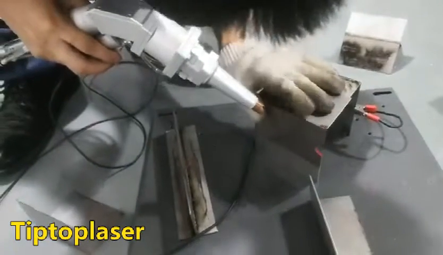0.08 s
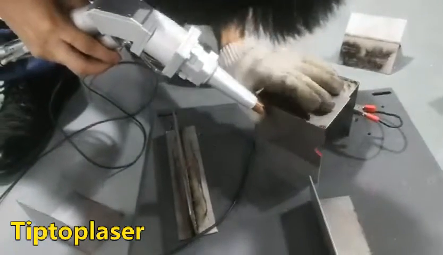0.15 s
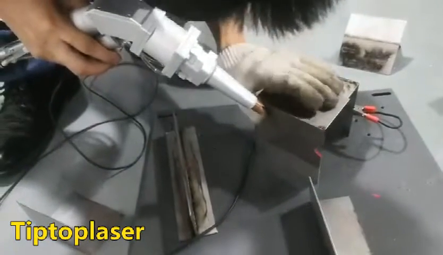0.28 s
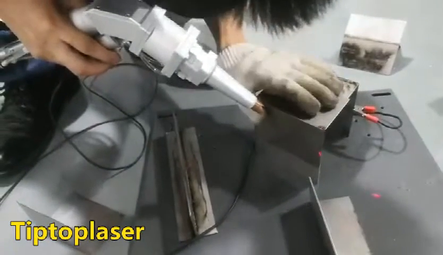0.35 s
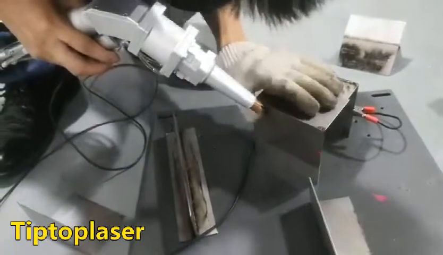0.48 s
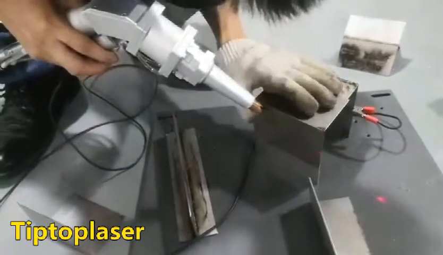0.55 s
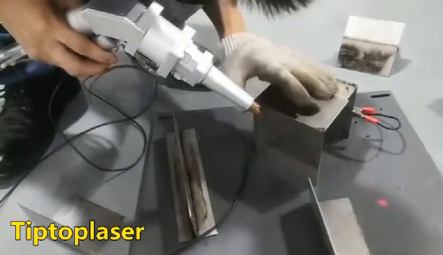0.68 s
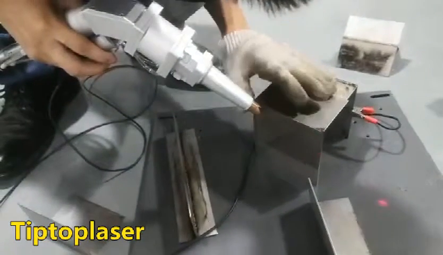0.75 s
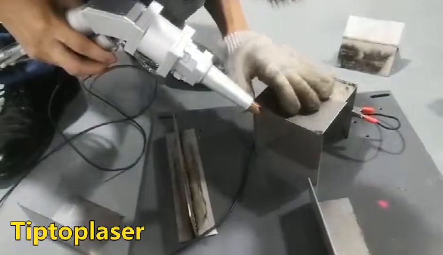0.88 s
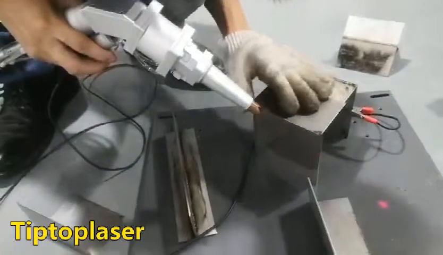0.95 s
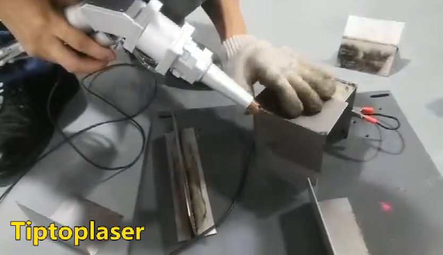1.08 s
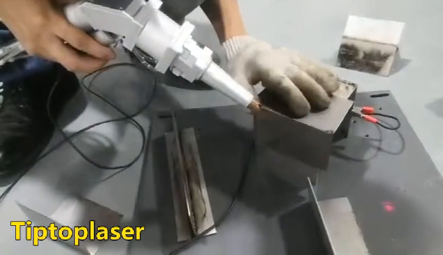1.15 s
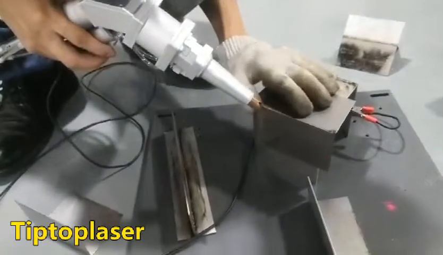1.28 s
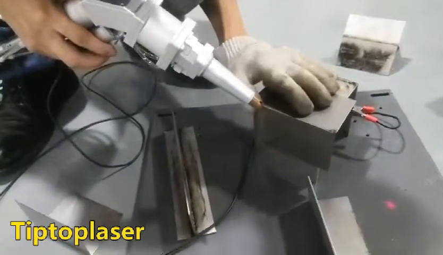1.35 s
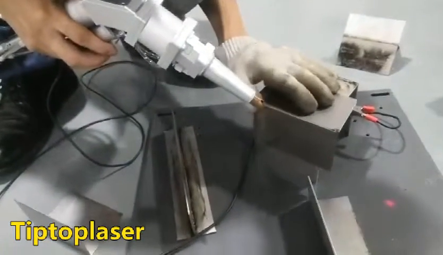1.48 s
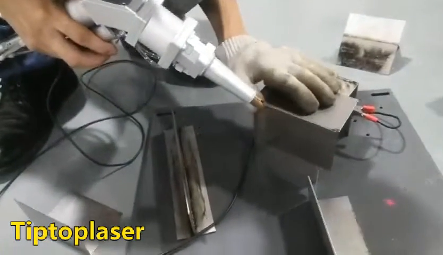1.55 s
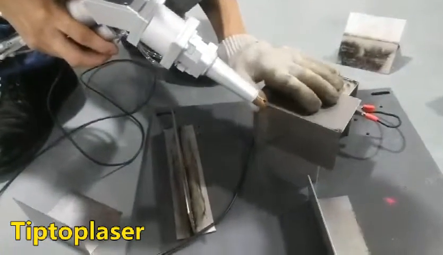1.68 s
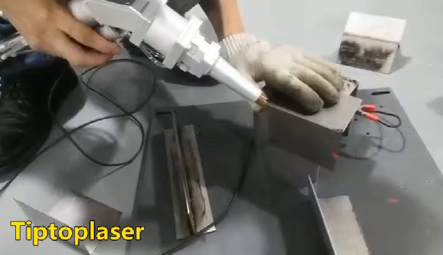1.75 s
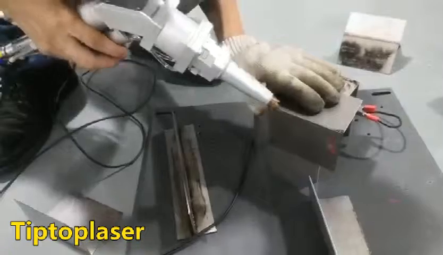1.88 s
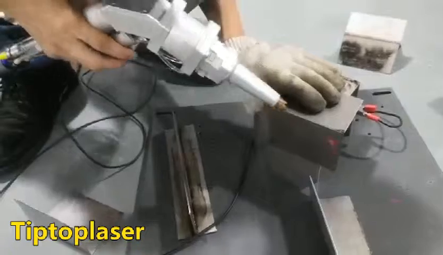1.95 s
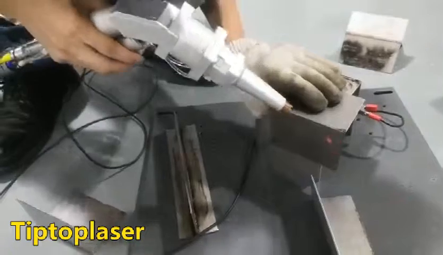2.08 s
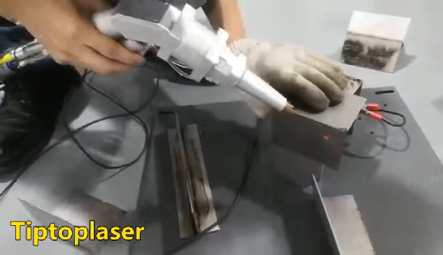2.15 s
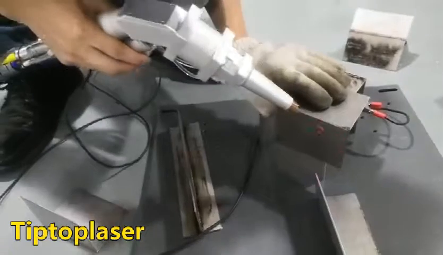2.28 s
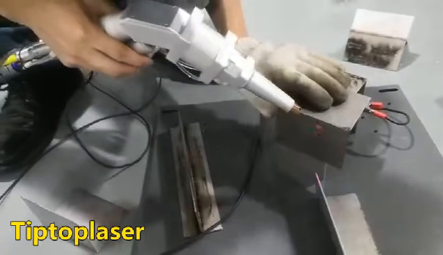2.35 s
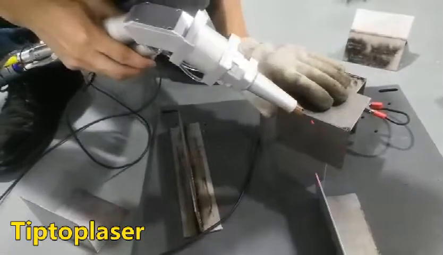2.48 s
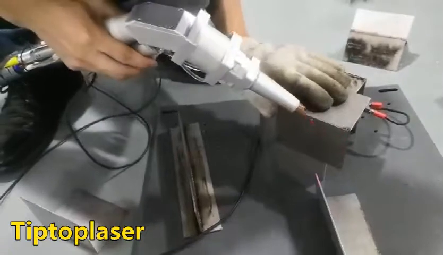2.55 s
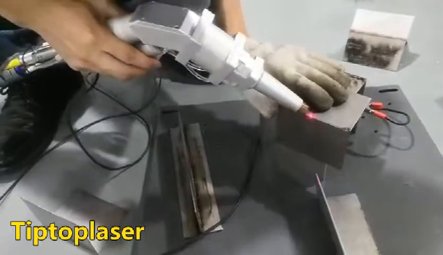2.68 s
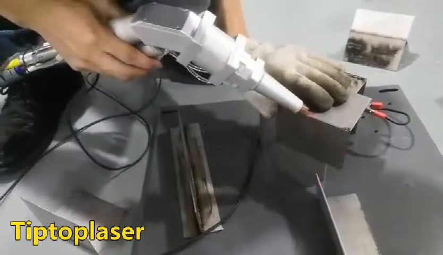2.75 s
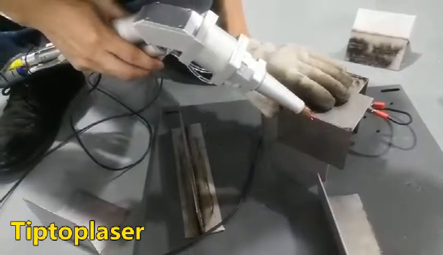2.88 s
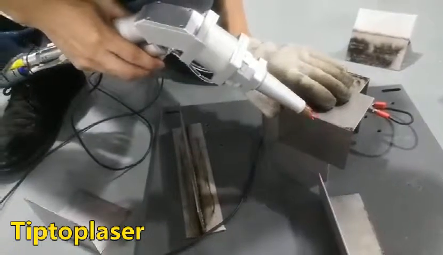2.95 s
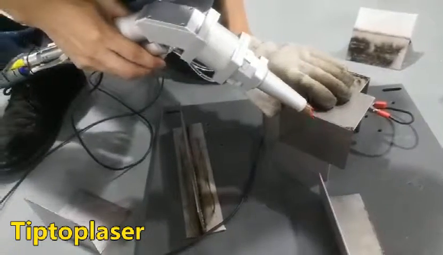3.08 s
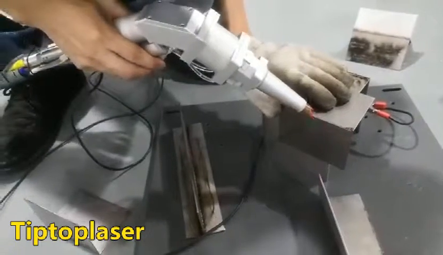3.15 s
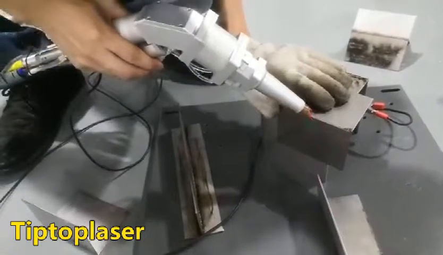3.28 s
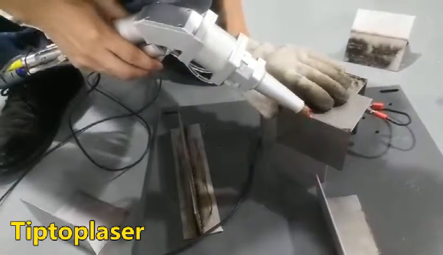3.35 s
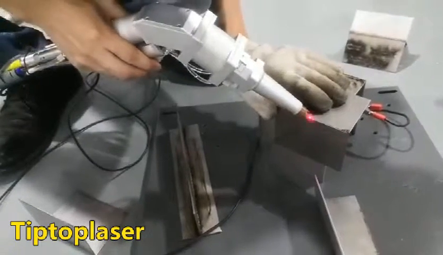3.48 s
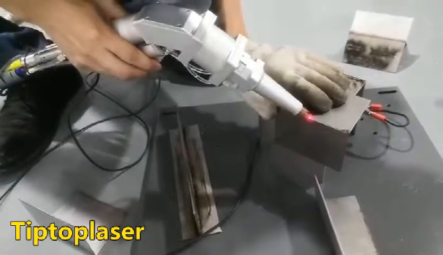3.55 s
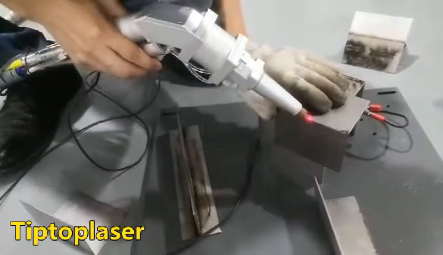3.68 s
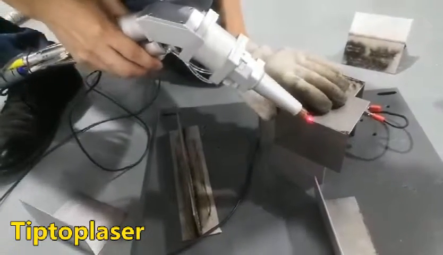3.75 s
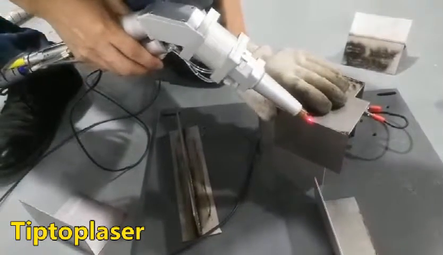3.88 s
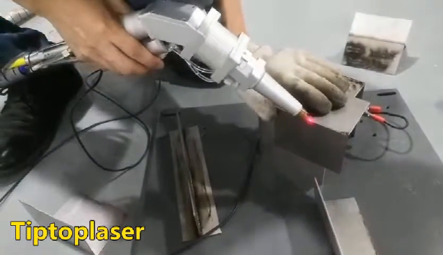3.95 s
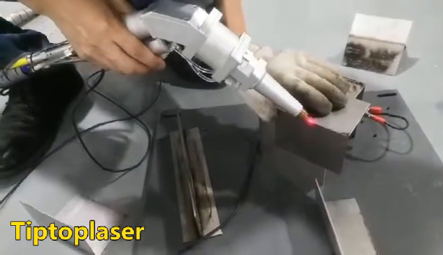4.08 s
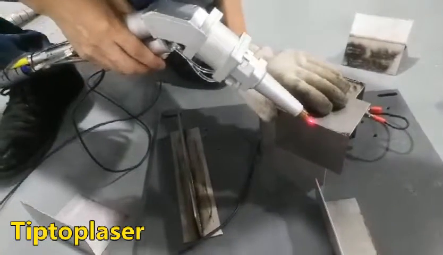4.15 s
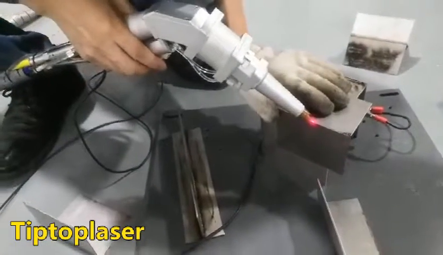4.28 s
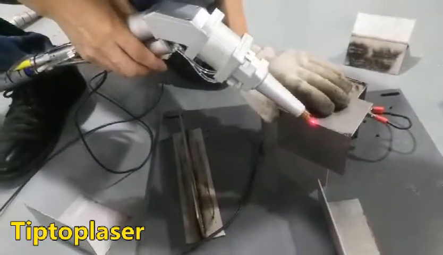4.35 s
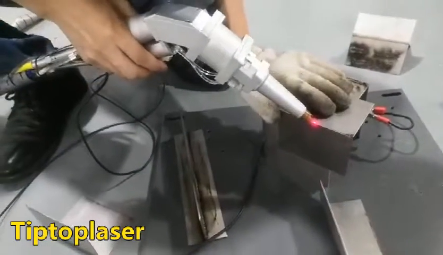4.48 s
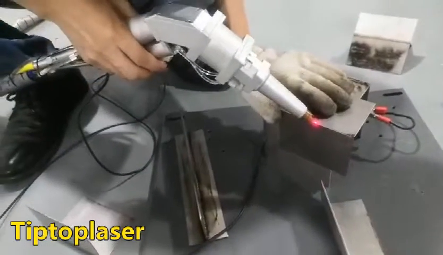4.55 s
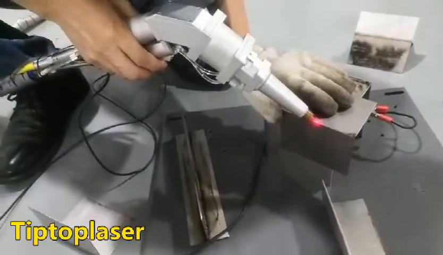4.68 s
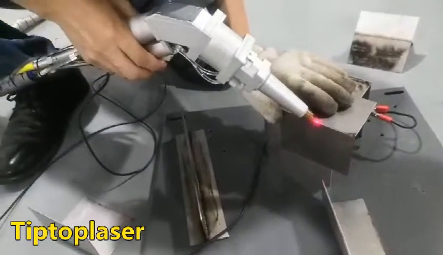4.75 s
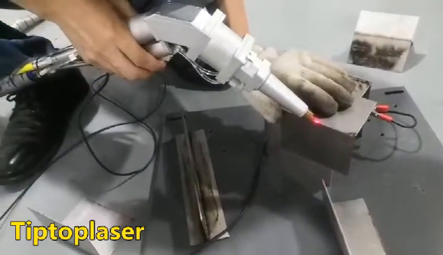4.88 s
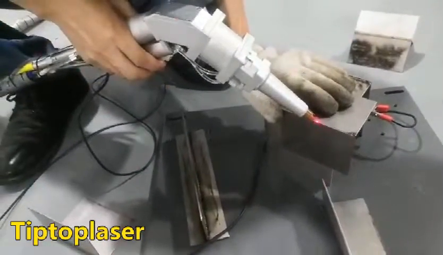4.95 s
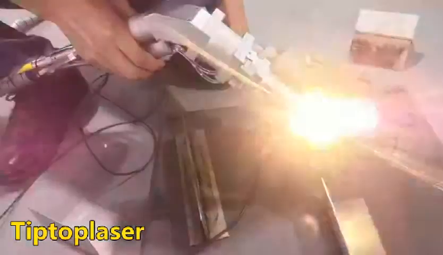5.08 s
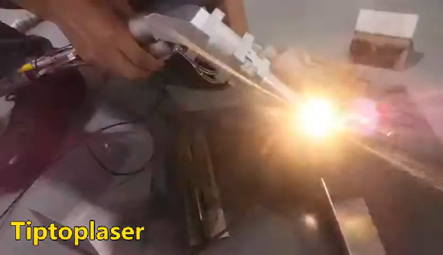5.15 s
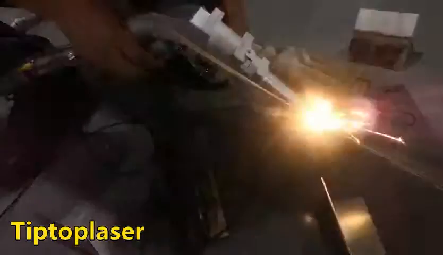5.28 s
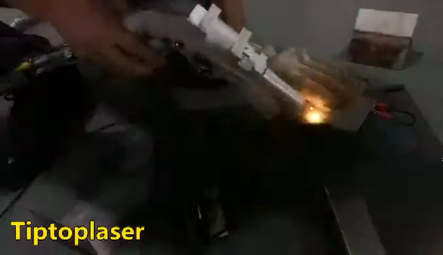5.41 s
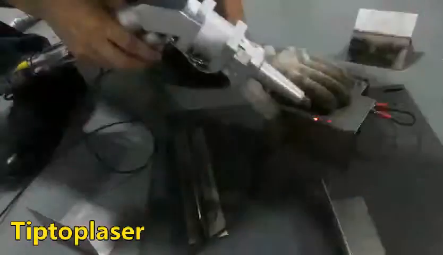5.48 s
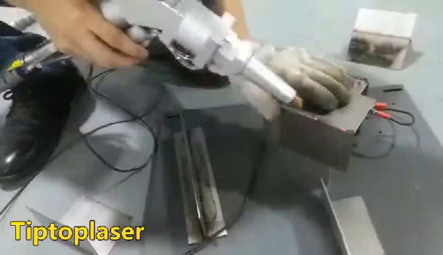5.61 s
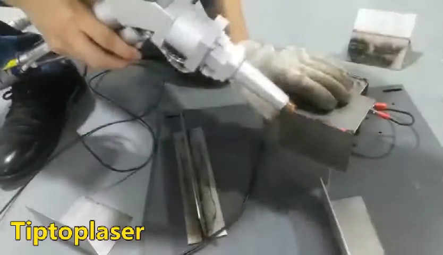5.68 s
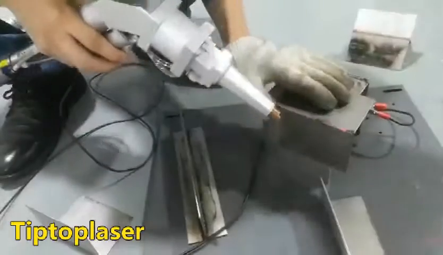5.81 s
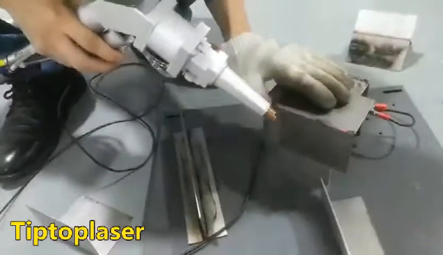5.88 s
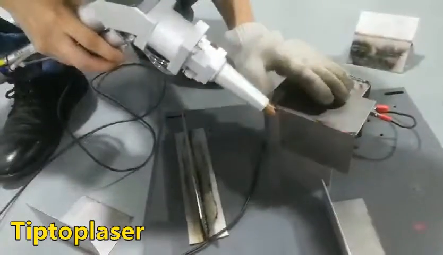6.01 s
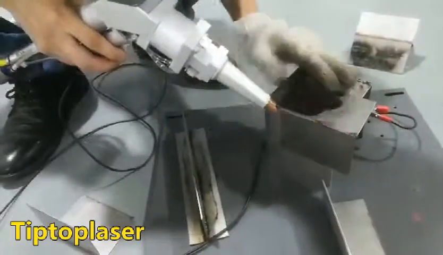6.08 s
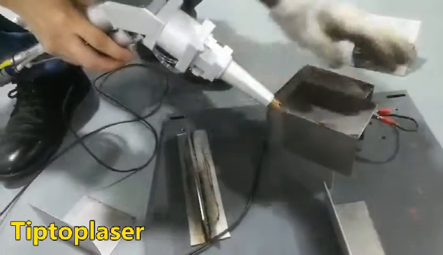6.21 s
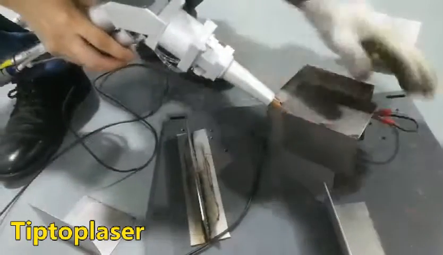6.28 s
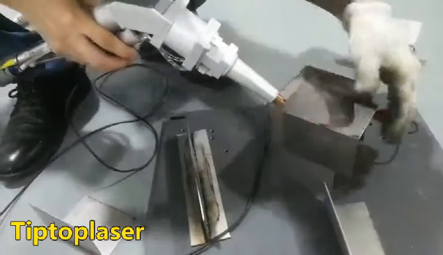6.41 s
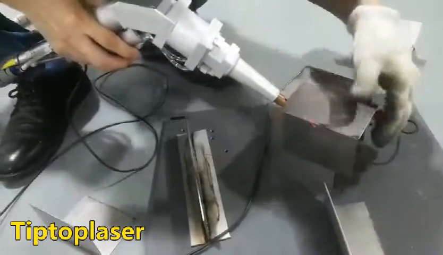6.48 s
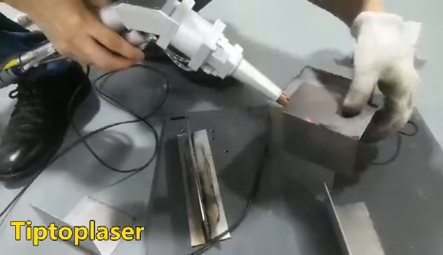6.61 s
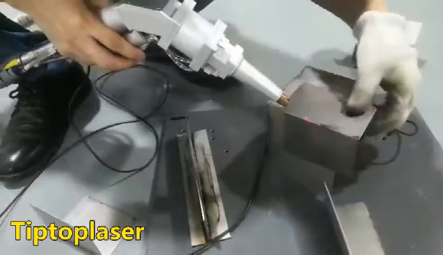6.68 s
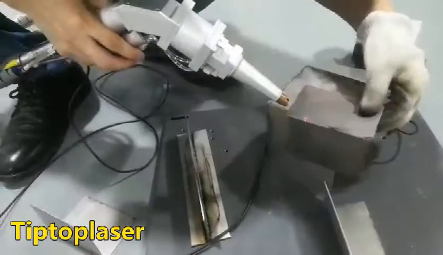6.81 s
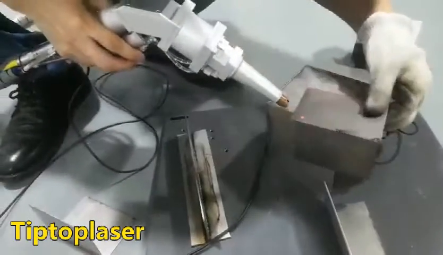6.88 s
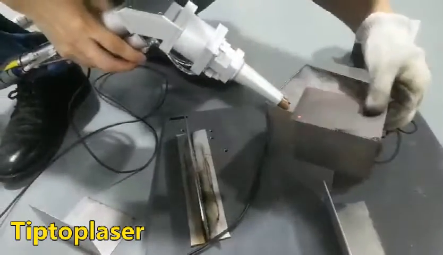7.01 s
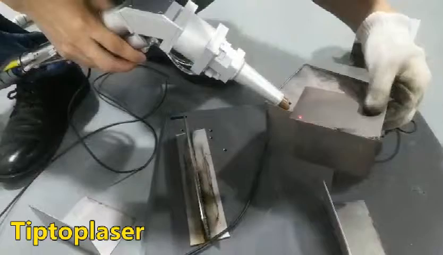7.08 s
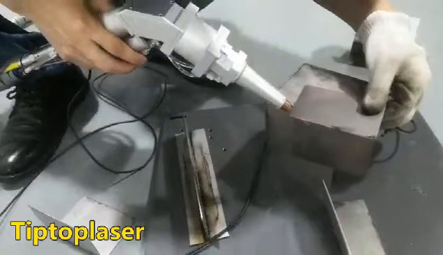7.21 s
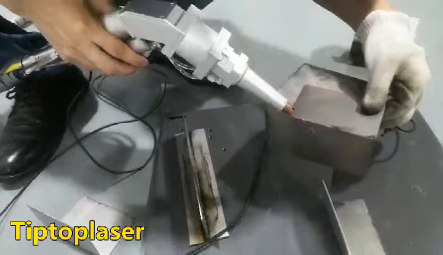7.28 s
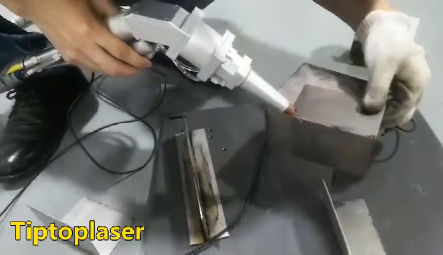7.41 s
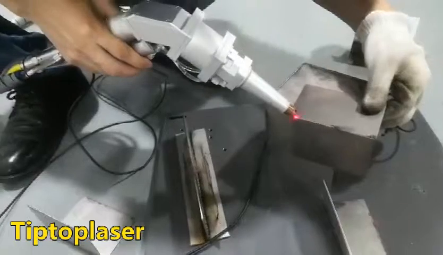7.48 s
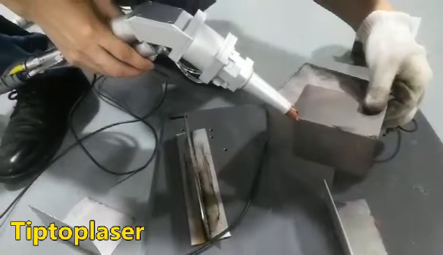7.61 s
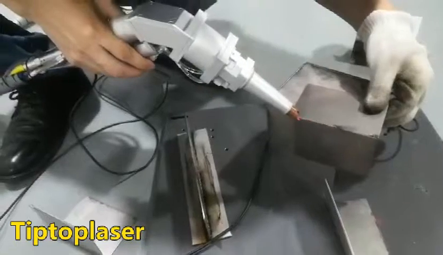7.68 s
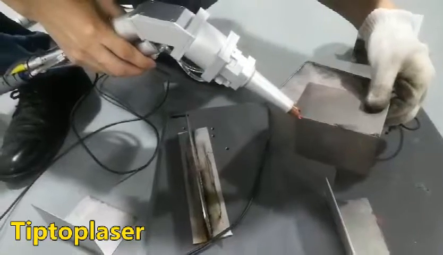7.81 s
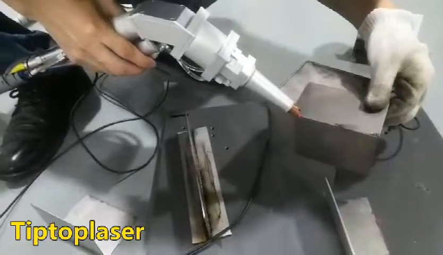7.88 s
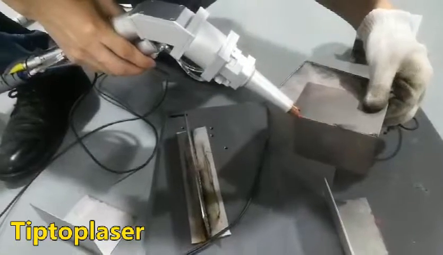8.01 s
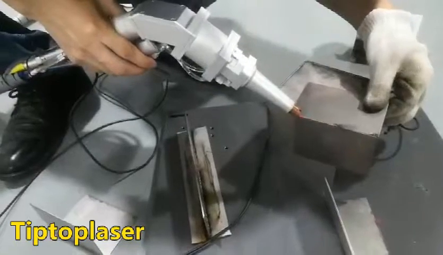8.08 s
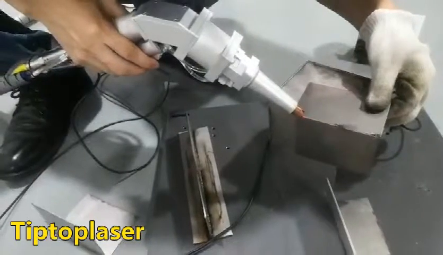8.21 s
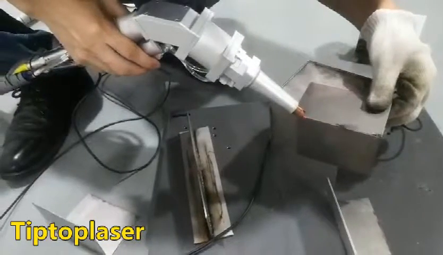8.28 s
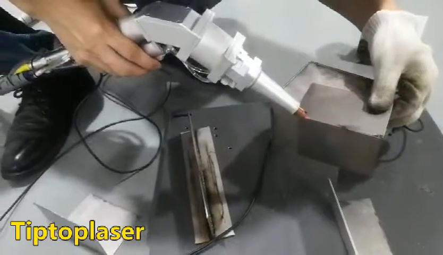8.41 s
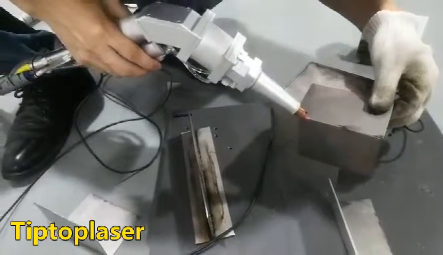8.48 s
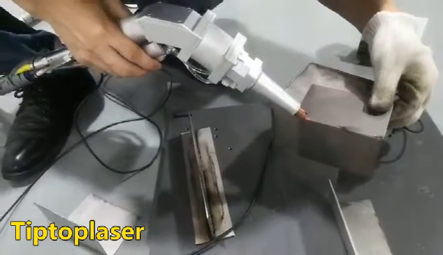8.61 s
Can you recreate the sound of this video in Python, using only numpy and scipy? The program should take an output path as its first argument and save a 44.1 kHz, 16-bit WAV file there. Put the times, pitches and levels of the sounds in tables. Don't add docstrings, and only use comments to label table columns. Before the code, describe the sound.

Over a throbbing machine hum and fan rush, a metal tip ticks and scrapes a steel box, then gas whistles around a short sputtering buzz.

```python
import sys
import numpy as np
from scipy import signal
from scipy.fft import rfft, irfft, next_fast_len
from scipy.io import wavfile
from scipy.ndimage import uniform_filter1d

SR = 44100
rng = np.random.default_rng(int(sys.argv[2]) if len(sys.argv) > 2 else 0)


def gain_from_decibels(decibels):
    exponent = np.asarray(decibels, float) / 20
    return 10 ** exponent


def dump_mix(stems):
    frames = np.atleast_2d(stems).T
    limited = np.clip(frames, -1, 1)
    pcm = np.round(limited * 32767).astype(np.int16)
    wavfile.write(sys.argv[1], SR, pcm)


N = 381465
LENGTH = next_fast_len(N + SR)
HZ = np.maximum(np.arange(LENGTH // 2 + 1) * SR / LENGTH, 1)
TIME = np.arange(N) / SR


def rms_one(x):
    return x / np.sqrt(np.mean(x ** 2) + 1e-20)


def at_hz(points):
    hz, value = np.transpose(points)
    return np.interp(np.log(HZ), np.log(np.maximum(hz, 1)), value)


def in_time(points):
    s, db = np.transpose(points)
    return np.interp(TIME, s, db, left=-120, right=-120)


def noise(spectrum):
    white = rfft(rng.standard_normal(LENGTH))
    return rms_one(irfft(white * gain_from_decibels(at_hz(spectrum)), LENGTH)[:N])


def whistle(hz, width_hz):
    r = np.exp(-np.pi * width_hz / SR)
    source = [1, 1j] @ rng.standard_normal((2, N + SR))
    slow = signal.lfilter([1], [1, -2 * r, r * r], source)[SR:]
    phase = 2 * np.pi * np.cumsum(hz * np.ones(N)) / SR
    return rms_one((slow * np.exp(1j * phase)).real)


def ring(clicks, hz, t60):
    r, w = gain_from_decibels(-60 / (t60 * SR)), 2 * np.pi * hz / SR
    return signal.lfilter([0, np.sin(w)], [1, -2 * r * np.cos(w), r * r], clicks + 1e-18)


def smeared(x, seconds):
    burst = rng.standard_normal(SR // 20) * np.exp(-np.arange(SR // 20) / (seconds * SR))
    return signal.fftconvolve(x, burst / np.linalg.norm(burst))[:N]


def ports(x, other, likeness, lag_s, from_hz=1, balance=((1, 0), (2, 0))):
    alike = np.clip(at_hz(likeness), 0, 1)
    delay = np.exp(-1j * np.pi * lag_s * HZ * np.clip(HZ / from_hz - 1, 0, 1))
    turn = delay * gain_from_decibels(at_hz(balance) / 2)
    shared = np.sqrt((1 + alike) / 2) * rfft(x, LENGTH)
    apart = np.sqrt((1 - alike) / 2) * rfft(other, LENGTH)
    return irfft([(shared + apart) * turn, (shared - apart) / turn], LENGTH)[:, :N]


def shop(x):
    t60_s, level_db = 0.36, -11.5
    tail = rng.standard_normal((2, SR)) * gain_from_decibels(-60 * TIME[:SR] / t60_s)
    tail *= TIME[:SR] > .008
    tail = signal.lfilter([1], [1, -.6], tail)
    return gain_from_decibels(level_db) * signal.fftconvolve(x[None], tail / np.linalg.norm(tail[0]), axes=1)[:, :N]


def far_bang():
    # (frequency [Hz], level [dB/Hz])
    tail_colour = [(180, -39), (300, -18), (499, -7.5), (2230, -5.5), (7100, -31.5), (8030, -41),
                   (8410, -50), (12000, -60), (15600, -83), (22000, -120)]
    level_db, t60_s = -22, 0.41
    return gain_from_decibels(level_db - 60 * TIME / t60_s) * noise(tail_colour)


def fans():
    # (frequency [Hz], level [dB/Hz])
    air_colour = [(20, -30), (36, -18), (50, -10.5), (75, -6.5), (125, -4), (250, -12), (430, -17.5),
                  (750, -26), (1500, -22), (2500, -27.5), (4300, -39), (6600, -44.5), (9000, -56.5),
                  (15500, -72.5)]
    # (frequency [Hz], width [Hz], level [dB])
    ducts = [(619, 87, -46.5), (1140, 52, -51.5), (1346, 66, -53.5), (1468, 37, -52)]
    return gain_from_decibels(-27) * noise(air_colour) + sum(gain_from_decibels(db) * whistle(hz, width) for hz, width, db in ducts)


def machine():
    # (multiple of the turn rate [1], peak level [dB])
    stroke_orders = [(11, -46), (12, -34.5), (17, -31), (19, -42), (20, -30.5), (21, -32.5), (22, -52.5),
                     (23, -30.5), (24, -44), (25, -31), (27, -34.5), (28, -41), (31, -41.5), (34, -40.5)]
    # (multiple of the turn rate [1], peak level [dB])
    casing_orders = [(30, -51), (36, -43.5), (42, -44.5), (52, -36), (53, -41.5), (54, -41), (62, -43),
                     (70, -42.5), (75, -53), (77, -45)]
    # (time into the turn [s], frequency [Hz], level [dB], t60 [s])
    knocks = [(.052, 1358, -30, 0.15), (.081, 1504, -33, 0.083), (0.169, 1140, -33, 0.13)]
    # (frequency [Hz], width [Hz], level [dB])
    motors = [(56.4, 1.1, -42), (97.5, 1.36, -41.5), (153.2, 0.45, -42.5), (193.2, 1, -47)]
    turn_hz, throb_s = 5.7416, .117
    sweep_s_per_order = 0.002283
    scatter_rad = .35
    out = np.zeros(N)
    for order, db in stroke_orders + casing_orders:
        phase = np.pi / 2 * (order % 2) * (order < 40)
        phase += np.pi * turn_hz * sweep_s_per_order * (min(order, 36) - 23) ** 2
        phase += scatter_rad * rng.standard_normal()
        out += gain_from_decibels(db) * np.cos(2 * np.pi * order * turn_hz * (TIME - throb_s) + phase)
    turns = np.arange(int(N / SR * turn_hz)) / turn_hz
    for s, hz, db, t60 in knocks:
        clicks = np.zeros(N)
        clicks[((turns + s) * SR).astype(int)] = gain_from_decibels(db + 2.1 * rng.standard_normal(len(turns)))
        soft_contact = np.convolve(clicks, np.hanning(24) / 8, "same")
        out += ring(soft_contact, hz, t60)
    return out + sum(gain_from_decibels(db) * whistle(hz, width) for hz, width, db in motors)


def bleed():
    # (frequency [Hz], level [dB/Hz])
    hiss_colour = [(3000, -27), (5500, -1), (7500, -9), (10000, -13), (15500, -26)]
    start_s, level_db, t60_s = 5.54, -52.5, 9
    age = np.maximum(TIME - start_s, 0)
    return (TIME > start_s) * gain_from_decibels(level_db - 60 * age / t60_s) * noise(hiss_colour)


def ticks():
    # (time [s], peak level [dB], ring frequency [Hz], ring t60 [s], crack level re peak [dB])
    touches = [(0.3594, -41, 7400, 0.05, -8), (0.7086, -48, 6510, 0.054, -4), (2.018, -33, 5470, 0.03, -9),
               (2.9322, -38, 5600, 0.05, -8), (3.9894, -44, 5470, 0.044, -13),
               (4.543, -42.5, 6500, 0.19, 9.5), (4.6134, -33, 5330, 0.074, 5),
               (6.573, -26, 5540, 0.041, -19), (6.575, -30, 4420, 0.088, -16),
               (7.0184, -39.5, 5620, 0.03, -10), (8.4514, -45, 5870, 0.05, -6)]
    # (peak level [dB], frequency [Hz], t60 [s])
    valve_pop = (-12, 2330, 0.032)
    valve_s, ring_share = 4.6145, .65
    out = np.zeros(N)
    bright = noise([(2500, -39), (5000, -5.0), (9000, 0), (15500, -16)])
    for s, db, hz, t60, crack_db in touches:
        age = np.maximum(TIME - s, 0)
        body = ring_share * np.sin(2 * np.pi * hz * age) + gain_from_decibels(crack_db) * bright
        out += (TIME > s) * gain_from_decibels(db - 60 * age / max(t60, .01)) * body
    db, hz, t60 = valve_pop
    age = np.maximum(TIME - valve_s, 0)
    return out + gain_from_decibels(db - 60 * age / t60) * np.sin(2 * np.pi * hz * age)


def pressure(s, db, rise, hold_s):
    sag_db_per_s, release_db_per_s = 89, 650
    age = TIME - s
    rising = rise * np.maximum(-age, 0)
    sagging = sag_db_per_s * np.clip(age, 0, hold_s)
    releasing = release_db_per_s * np.maximum(age - hold_s, 0)
    return gain_from_decibels(db - rising - sagging - releasing)


def scrapes():
    # (time of full pressure [s], level [dB], rise [dB/s], hold [s])
    strokes = [
        (.978, -13.5, 600, .07),
        (1.331, -23, 800, 0.0046),
        (1.445, -32, 900, 0.034),
        (6.666, -18, 330, .04),
    ]
    # (frequency [Hz], width [Hz], level [dB])
    damped_modes = [[(630, 88, -18), (1137, 170, -13.5)] + [(1940, 43, -14), (2450, 110, -21),
                    (3800, 84, -12), (4340, 70, -6), (5490, 114, 1.5), (5550, 86, -7), (6550, 8, 4),
                    (6280, 30, 4), (7700, 43, -7), (7350, 61, 6.5), (8900, 240, -9), (11800, 68, -11),
                    (12600, 37, -9), (13800, 77, -10)], [(2510, 170, 0), (3260, 200, -16),
                    (4020, 130, -4.5), (5720, 100, 3.5), (6060, 150, -4.5), (7450, 150, -4),
                    (12600, 200, -19)], [(5430, 60, 5), (6510, 38, -4), (8010, 42, -12), (11400, 39, -38),
                    (11700, 49, -34), (12300, 26, -32)], [(2420, 73, -2), (2970, 190, -13), (4380, 90, 0.5),
                    (5330, 62, -4), (5770, 110, -6), (6500, 100, -13), (7670, 60, -9), (9070, 130, -14.5),
                    (11250, 98, -17), (12800, 90, -23), (14600, 200, -36)]]
    # (frequency [Hz], level [dB], t60 [s])
    free_modes = [
        [(2283, -0.5, .4), (3396, -12, 0.85), (4255, -2.5, 0.41), (5290, -5, 0.49), (7300, -13, .36),
         (7440, -4, .28), (7680, 1.5, 0.36), (8091, -22, .27), (8700, -12, 0.43), (10230, -17, .2),
         (10390, -18, .3), (11530, -24, .18)],
        [(5600, -8, .1), (6514, -12, .1)],
        [(6520, -6, .08)],
        [(2800, -15, .26), (4280, -19, .2), (5640, -17, .25), (6934, -7, 0.18), (7580, -6, 0.24)],
    ]
    grit_levels = [-12.5, -12, -10, -23]
    # (frequency [Hz], level [dB/Hz])
    grit_colour = [(290, -46), (500, -2), (2100, -21), (2360, 5), (3150, -19.5), (5510, -26), (6930, 2),
                   (7450, -10), (15500, -24)]
    # (time [s], peak level [dB])
    catch_table = [(0.9602, -8), (0.968, -9), (0.9757, -9), (0.9822, -18), (1.0024, -9), (1.0085, -14),
                   (1.016, -13), (1.04, -15), (1.0514, -8), (1.317, -27), (1.327, -29), (1.3357, -20),
                   (6.632, -30), (6.6572, -18), (6.668, -20), (6.6944, -21), (6.7074, -23)]
    damping, ring_db = 1.3, -16.5
    chatter_db, chatter_s = 4, .007
    catch_s, catch_db = np.transpose(catch_table)
    catch_at = (catch_s * SR).astype(int)
    sizes = gain_from_decibels(1.8 * np.minimum(rng.exponential(1, N), 3.5)) * rng.choice([-1, 1], N)
    contacts = rms_one((rng.random(N) < 1500 / SR) * sizes)
    grit = noise(grit_colour) * gain_from_decibels(3.4 * whistle(0, 200))
    shaken = np.zeros(N)
    shaken[catch_at] = 1
    shaken = signal.lfilter([1], [1, -np.exp(-1 / (chatter_s * SR))], shaken)
    chatter = gain_from_decibels(chatter_db * (2 * np.minimum(shaken, 1) - 1))
    out = np.zeros(N)
    for stroke, damped, free, grit_db in zip(strokes, damped_modes, free_modes, grit_levels):
        s, stroke_db, _, hold_s = stroke
        push = pressure(*stroke) * chatter
        catches = np.zeros(N)
        catches[catch_at] = gain_from_decibels(catch_db + 11.5) * (push[catch_at] > 1e-4)
        for hz, width, db in damped:
            drive = np.roll(contacts, int(hz)) * push + catches * gain_from_decibels(3.0 * rng.standard_normal(N))
            out += gain_from_decibels(db - 30.5) * width / 50 * ring(drive, hz, damping / width)
        let_go = int((s + hold_s) * SR)
        for hz, db, t60 in free:
            rung = ring(np.roll(contacts, int(hz)) * push + 1.4 * catches, hz, t60)
            peak = np.abs(rung[let_go:let_go + SR // 40]).max()
            out += gain_from_decibels(db + stroke_db + ring_db) * rung / peak
        out += gain_from_decibels(grit_db) * push * grit
    return signal.sosfilt(signal.butter(2, 420, "high", fs=SR, output="sos"), out)


def plume():
    # (time [s], level [dB])
    beam_level = [
        (4.85, -46),
        (4.902, -30),
        (5.172, -30.5),
        (5.298, -43.5),
        (5.31, -58),
    ]
    # (frequency [Hz], level [dB/Hz])
    vapour_colour = [(700, -58), (1500, -23), (2200, -13), (2900, -19.5), (4100, -13), (5100, -7.5),
                     (5700, -12.5), (6600, -10), (7400, -12.5), (8900, -11), (10000, -17.5), (11200, -15),
                     (15500, -25)]
    # (multiple of the pulse rate [1], level re plume [dB])
    beam_orders = [(2, -15), (3, -18), (4, -29), (5, -11.5), (6, -16), (7, -22), (8, -28), (9, -17),
                   (14, -24.5)]
    pulse_hz, waver_db, sputter_db = 1000.1, 3, 1.6
    sound = noise(vapour_colour) * gain_from_decibels(sputter_db * whistle(0, 240))
    for order, db in beam_orders:
        phase = 2 * np.pi * rng.random()
        line = np.cos(2 * np.pi * order * pulse_hz * TIME + phase)
        sound += gain_from_decibels(db + waver_db * whistle(0, 25)) * line
    return gain_from_decibels(in_time(beam_level) + 12.0) * sound


def gas():
    # (time [s], level [dB])
    flow = [
        (4.6, -21),
        (4.645, -4.5),
        (4.72, 0.5),
        (5.2, -1.5),
        (5.3, -5),
        (5.505, -5.5),
        (5.56, -38),
        (5.7, -50),
    ]
    # (frequency [Hz], width [Hz], level at full flow [dB],
    # gain while lifting [dB/s], pitch gained by lifting [Hz])
    loud_modes = [(2328, 185, -27, -24, 4.95), (3893, 180, -27.5, 39, 15), (5327, 180, -21, 54, 100)]
    mode_follows = [0.65, 0.82, 1.3]
    # (frequency [Hz], width [Hz], level [dB])
    upper_modes = [(6930, 150, -0.5), (8730, 260, -4), (10800, 320, -9), (12070, 400, -6),
                   (13600, 350, -16), (14900, 300, -25)]
    # (frequency [Hz], level [dB/Hz])
    jet_hiss = [(900, -70), (2100, -6.5), (3000, -16.5), (4300, -13.5), (5100, -1), (5900, -14.5),
                (6900, -7), (7600, -34), (8300, -42), (8900, -9), (10050, -30), (10900, -20), (12800, -22),
                (14000, -17.5), (15500, -12)]
    lift_s, lift_lasts_s = 5.305, 0.14
    overshoot, settle_s = 2.2, .05
    flutter_db, flutter_hz = 1.3, 25
    wander_hz = 22.02
    upper_db, upper_lift_db, upper_follows = -28, -1, 0.98
    flow_db, lifted = in_time(flow), TIME > lift_s
    age = np.maximum(TIME - lift_s, 0)
    rise = lifted * (1 + overshoot * np.exp(-age / settle_s))
    loud = np.zeros(N)
    for (hz, width, db, db_per_s, lift_hz), follows in zip(loud_modes, mode_follows):
        level_db = db + follows * flow_db + db_per_s * np.minimum(age, lift_lasts_s)
        level_db += flutter_db * whistle(0, flutter_hz)
        pitch = hz + lift_hz * rise + wander_hz * whistle(0, 29.74)
        loud += gain_from_decibels(level_db) * whistle(pitch, width)
    upper = sum(gain_from_decibels(db) * whistle(hz, width) for hz, width, db in upper_modes)
    upper += gain_from_decibels(7.0) * noise(jet_hiss)
    return loud + gain_from_decibels(upper_db + upper_follows * flow_db + upper_lift_db * lifted) * upper


def scene():
    # (frequency [Hz], likeness [0-1])
    room_likeness = [(60, 0.98), (130, 1), (290, 0.84), (640, 0.03), (1400, 0.05), (3000, 0.1), (7000, 0),
                     (15000, 0)]
    gun_likeness = [(500, 0.56), (2300, 0.78), (5000, 0.95), (9000, 0.76), (15000, 0.3)]
    box_likeness = [(500, 0.3), (2300, 0.88), (5000, 0.9), (9000, 0.3), (15000, 0)]
    # (frequency [Hz], left minus right [dB])
    gun_balance = [(700, 9), (1290, 2), (2380, 7.5), (4400, -2.5), (8120, -1.5), (15000, -0.5)]
    box_balance = [(640, -5), (1400, 2), (3100, 1), (6800, -1.2), (15000, 2)]
    hum = machine()
    room = hum + fans() + far_bang()
    other_room = smeared(hum, 0.015) + fans() + far_bang()
    far = ports(room, other_room, room_likeness, lag_s=0.000572, from_hz=286)
    jets = gas() + plume() + bleed()
    other_jets = gas() + plume() + bleed()
    gun = ports(jets, other_jets, gun_likeness, lag_s=.00004, balance=gun_balance)
    contacts = scrapes() + ticks()
    box = ports(contacts, smeared(contacts, 0.0021), box_likeness, lag_s=.00003, balance=box_balance)
    return far + gun + box + shop(jets + contacts)


def band_limit(x):
    return signal.sosfilt(signal.butter(12, 15800, fs=SR, output="sos"), x)


def record(dry):
    threshold_db, squeeze = -27, 0.2
    power = uniform_filter1d(np.mean(dry ** 2, axis=0), size=SR // 4)
    level_db = 10 * np.log10(power + 1e-12)
    held = dry * gain_from_decibels(-squeeze * np.maximum(level_db - threshold_db, 0))
    top_cut = signal.ellip(12, .5, 70, 15140, fs=SR, output="sos")
    return band_limit(signal.sosfilt(top_cut, held))


dry = scene()
out = record(dry)
dump_mix(out)
```